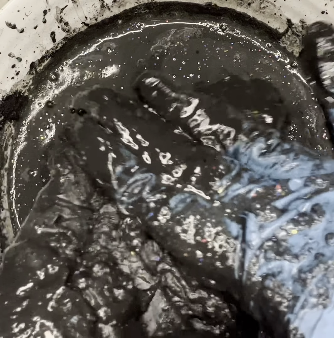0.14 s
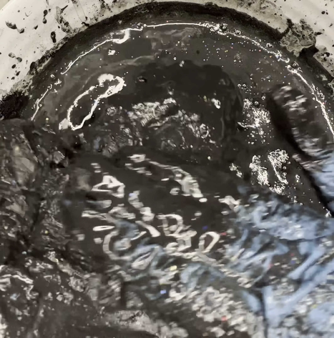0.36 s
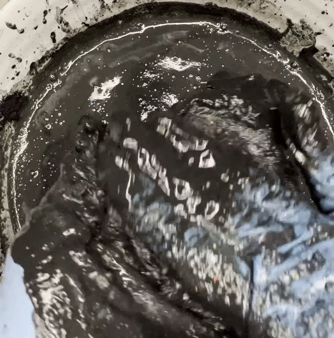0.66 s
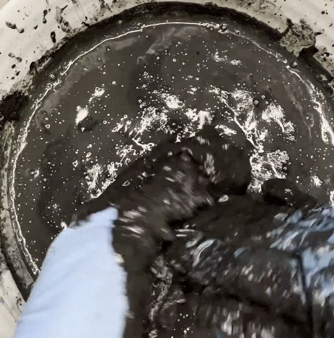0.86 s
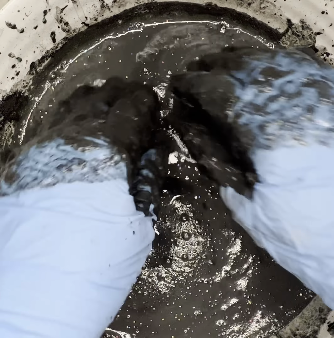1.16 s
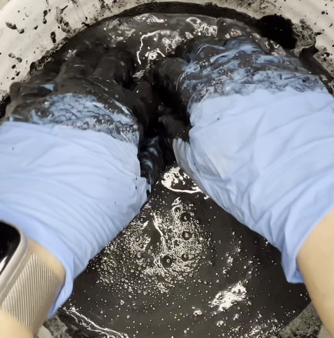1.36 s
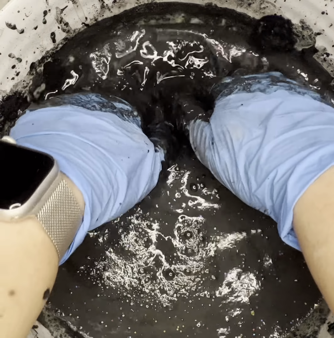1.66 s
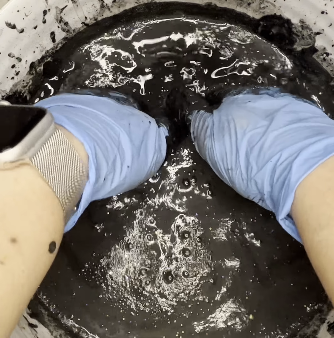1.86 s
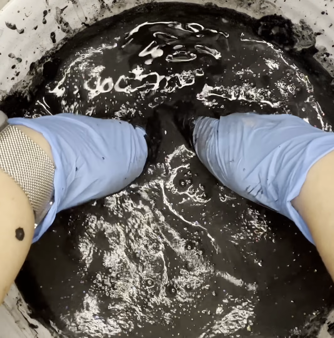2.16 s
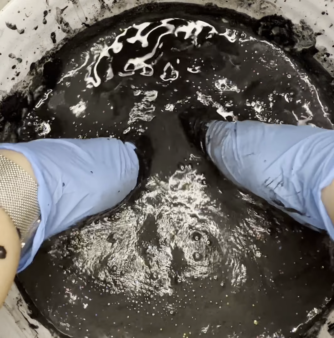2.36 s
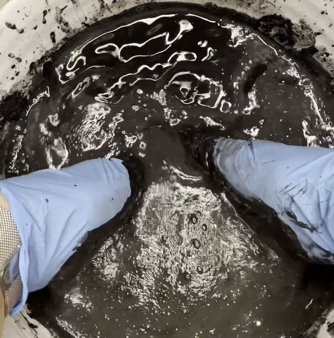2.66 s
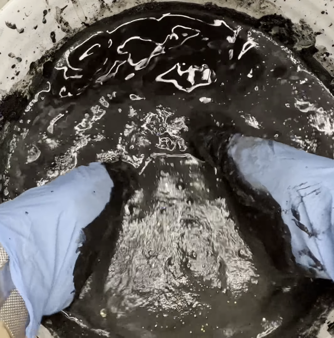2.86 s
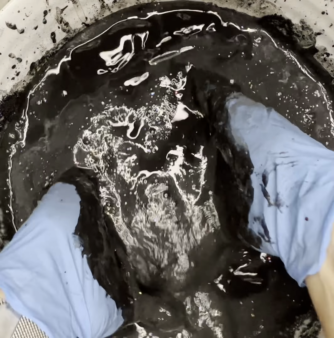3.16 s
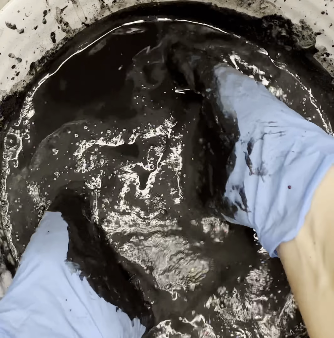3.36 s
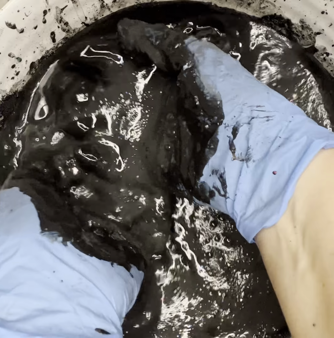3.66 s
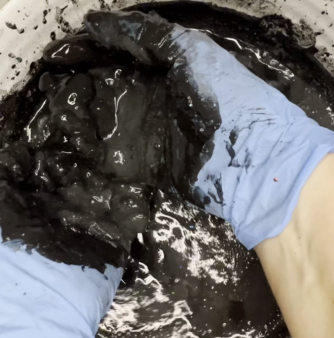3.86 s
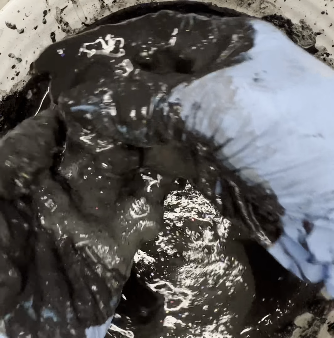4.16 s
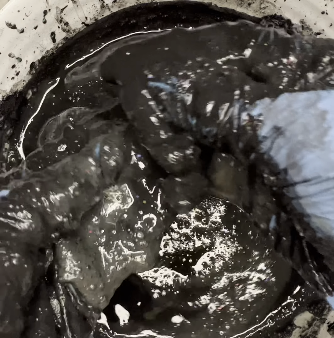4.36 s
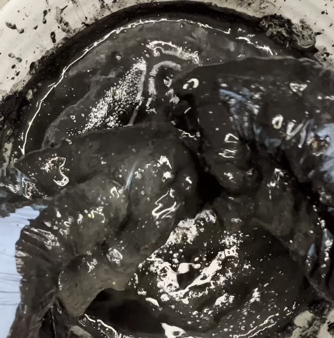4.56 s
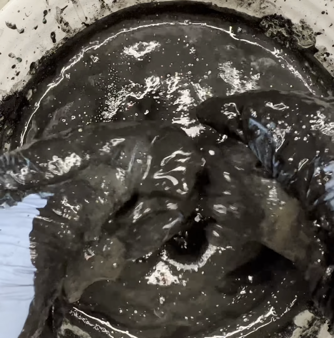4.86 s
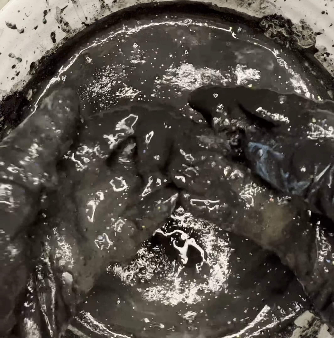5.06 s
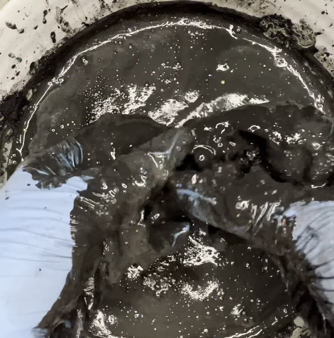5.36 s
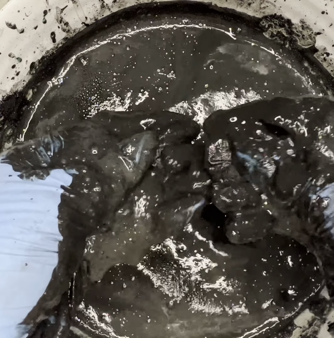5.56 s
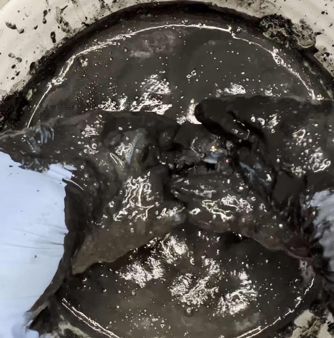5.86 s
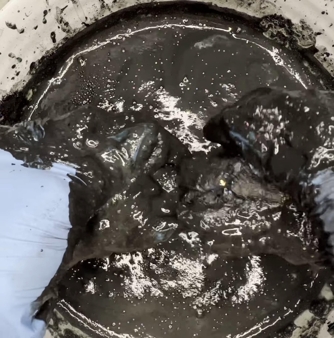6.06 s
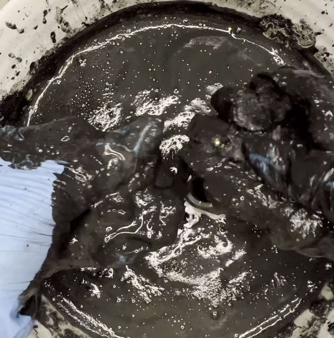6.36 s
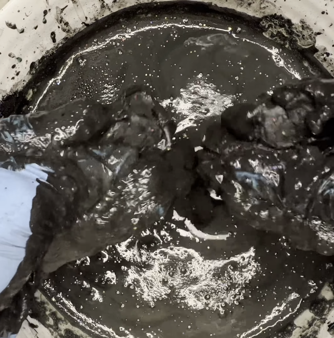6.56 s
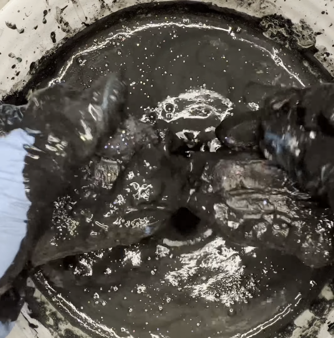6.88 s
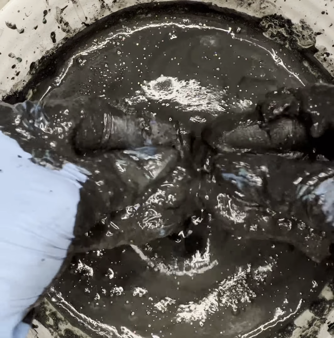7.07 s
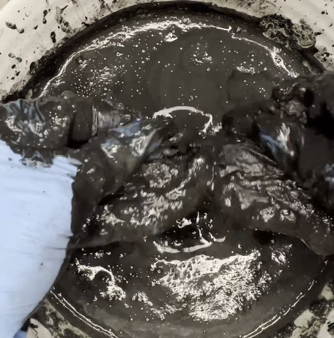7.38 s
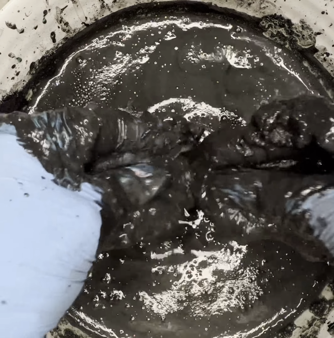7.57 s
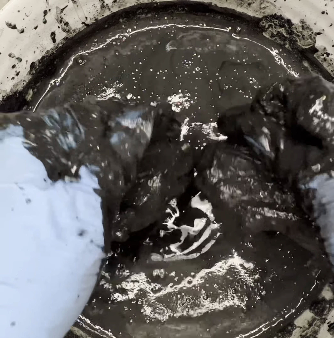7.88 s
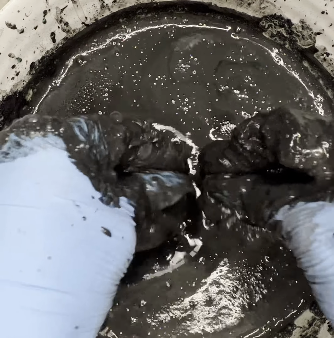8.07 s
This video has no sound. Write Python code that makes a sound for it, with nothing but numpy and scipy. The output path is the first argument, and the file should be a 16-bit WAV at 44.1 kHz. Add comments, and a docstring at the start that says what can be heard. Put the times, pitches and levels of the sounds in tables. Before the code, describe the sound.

Soaked chalk is crushed in a bowl of slurry, heard close and dry. Crunchy, fizzing crumbs open the scene, followed by sharp snaps, gulping paste and a dull push on the bowl. A lull ends in one forceful break. Irregular pops and ticks then run into renewed grainy crackling, all over a steady low electrical hum, room rumble and, late on, a faint distant motor.

```python
"""A small room with mains hum, low rumble and, late on, a distant motor spinning up.
Close to a phone, gloved hands crush water-soaked chalk in a bowl of slurry.
Snaps are short fractures through filters with ringing wet pockets; one block rings as it breaks in two.
Grit, crumbs and squelching paste are showers of random clicks, coloured and ridden by the hands.
Gulps are sputtering clicks through one resonance; pushes ring the bowl as decaying sines."""
import sys
import numpy as np
from scipy import signal
from scipy.fft import rfft, irfft
from scipy.io import wavfile
from scipy.ndimage import uniform_filter1d

SR = 44100
rng = np.random.default_rng(int(sys.argv[2]) if len(sys.argv) > 2 else 0)


def to_wav(s):
    """Save 16-bit WAV."""
    ch = np.atleast_2d(s).T  # columns
    pcm = np.round(np.clip(ch, -1, 1) * 32767)  # PCM
    wavfile.write(sys.argv[1], SR, pcm.astype(np.int16))


N = 362502
TIME = np.arange(N) / SR  # s
OPPOSITE = np.array([[1], [-1]])  # left and right pulled apart

# Event levels are set before panning.
# motor's second order, twice its turning rate: [t/s, f/Hz, level/dB]
MOTOR = [(6.1, 140, -93), (6.55, 181, -42.5), (6.9, 201, -65), (7.3, 211, -46.5), (8.22, 213, -46.5)]
# steady work of the hands: [t/s, rubbing level/dB shared by crumbs and grit, paste squelch level/dB]
HANDS = [(0.0, -41.5, -62), (0.82, -43, -56), (1.19, -50.5, -53.5), (1.58, -43, -43.5), (1.83, -49, -46.5),
         (2.27, -49, -47.5), (3.07, -56, -58), (3.59, -57.5, -57), (5.01, -50, -56), (5.33, -52, -49),
         (5.91, -48, -54), (6.68, -42, -53.5), (7.3, -44, -51), (7.62, -40, -53), (8.08, -40.5, -51),
         (8.22, -41.5, -46.5)]
# finger strokes across the chalk: [t/s, length/s, crumb level/dB, grit over crumbs/dB]
STROKES = [(0.043, 0.11, -42, 5), (0.272, 0.081, -40, -5), (0.372, 0.12, -43.5, 2),
           (0.596, 0.33, -43.5, 1.5), (1.498, 0.075, -41, -11), (1.628, 0.083, -43.5, -0.5),
           (4.378, 0.11, -48.5, -13), (6.449, 0.186, -44, 3.5), (6.8, 0.096, -47, 6.5),
           (6.93, 0.1, -45.5, -2), (7.339, 0.14, -47, 6.5), (7.664, 0.24, -52.5, 12.5)]
# hollow between the fingers: [t/s, ratio applied to the texture's resonances]
FINGER_GAP = [(0, 0.8), (.9, 0.82), (1.68, 1), (1.79, 0.71), (2.6, 1), (6.3, 0.96)]
# where the fingers work: [t/s, added shift to the left/dB]
SIDE_OF_WORK = [(1.2, -1.5), (1.85, 2), (2.6, 0)]
# lumps giving way: [t/s, wet pocket f/Hz, pocket level/dB, crack level/dB, grit tick level/dB]
SNAPS = [(0.3973, 3550, -34, -27, -22), (0.8656, 1000, -43.5, -38.5, -23), (1.111, 1220, -28.5, -27, -26.5),
         (1.194, 990, -26.5, -20.5, -22), (3.295, 1130, -21, -20, -30.5), (4.006, 1597, -38.5, -33.5, -38),
         (4.1524, 576, -34.5, -37, -41), (4.47, 640, -42, -40.5, -35), (4.5575, 606, -37.5, -38.5, -40),
         (4.64, 3480, -38.5, -27.5, -26), (4.7222, 1420, -33.5, -30.5, -31.5),
         (4.9089, 1390, -34.5, -32.5, -35.5), (4.937, 730, -26, -28.5, -25), (4.955, 690, -37, -36, -30),
         (4.973, 700, -38.5, -44, -31), (5.187, 2700, -41, -30.5, -32.5), (5.2651, 695, -34, -28, -26),
         (5.269, 1400, -41, -29, -27), (5.2991, 616, -27.5, -28.5, -25), (5.5023, 637, -40.5, -37.5, -43),
         (5.604, 2530, -30, -48, -32), (5.698, 931, -37, -29, -39), (5.7129, 580, -48, -45, -29),
         (6.05, 646, -17.5, -34, -36), (6.3665, 569.6, -68, -44, -28.5), (6.7945, 1700, -47, -46, -29.5),
         (7.0684, 674, -48, -36.5, -32), (7.386, 930, -35.5, -34.5, -36), (7.8731, 2380, -37.5, -24, -32),
         (8.188, 656, -53, -35, -27)]
# small pieces coming off: [t/s, f/Hz, level/dB]
FRAGMENTS = [(1.364, 3440, -36), (2.133, 6700, -39.5), (3.6426, 1220, -41), (4.0526, 4900, -38),
             (4.23, 590, -37.5), (4.385, 4470, -39), (4.4336, 3100, -31.5), (4.453, 3050, -43),
             (4.481, 1120, -38), (4.526, 1830, -34.5), (4.5787, 1880, -39), (4.645, 3324, -47),
             (4.762, 6900, -36), (4.8572, 1060, -29.5), (4.879, 2280, -43), (5.0134, 1430, -32),
             (5.2344, 914, -27.5), (5.34, 691, -37), (5.353, 720, -39.5), (5.5524, 2430, -32.5),
             (5.576, 2486, -43), (5.786, 1950, -43), (6.027, 6370, -33.5), (6.186, 7700, -34),
             (6.646, 9400, -36.5), (6.804, 2500, -34.5), (6.8793, 2920, -26.5), (6.892, 5640, -35),
             (7.079, 6400, -38.5), (7.5263, 2600, -28.5)]
# chalk tearing and caving in: [t/s, length/s, level/dB before the swell]
TEARS = [(1.107, 0.0047, -19), (1.683, 0.015, -33), (3.295, 0.022, -29), (3.315, 0.079, -33.5),
         (3.3476, 0.019, -23), (3.372, 0.014, -31.5), (3.394, 0.015, -40), (4.212, 0.029, -39)]
# pushes that reach the bowl and table: [t/s, level/dB on top of the bowl's modes]
THUMPS = [(1.347, -32), (3.295, -23.5), (4.938, -31), (5.301, -38.5)]
# modes of the bowl on the table: [f/Hz, level/dB relative to the push, t60/s]
BOWL_MODES = [(74.8, 1, 0.84), (153, 10, 0.13), (205, 4, 0.072)]
# air and slurry squeezed out: [t/s, time to swell/s, f/Hz, level/dB before the swell]
GULPS = [(1.351, 0.0055, 1200, -30), (1.544, 0.0093, 1700, -34.5), (1.684, 0.0079, 1520, -30.5),
         (1.765, 0.0068, 537, -33), (1.862, 0.0092, 8500, -39), (3.574, 0.022, 1110, -55),
         (3.815, .025, 3540, -49.5)]
# modes of the big block as it breaks: [f/Hz, starting peak level/dB]
BLOCK_MODES = [(1020, -8.5), (1450, -6), (2500, -6)]

# Colours are spectral outlines; only their shape counts, as the level is set afterwards.
# room rumble: [f/Hz, level/dB]
ROOM_COLOUR = [(24, 1.5), (38, -8.5), (170, -13.5), (300, -25.5), (1000, -38), (4000, -65), (15000, -53)]
# table rumble under the paste: [f/Hz, level/dB]
TABLE_COLOUR = [(55, -12.5), (300, -37), (900, -53.5)]
# wet paste: [f/Hz, level/dB]
PASTE_COLOUR = [(200, 2), (400, -1), (640, 7), (820, -1.5), (1020, 7), (1500, -3), (2100, -0.5),
                (4000, -71)]
# collapsing crumbs: [f/Hz, level/dB]
CRUMB_COLOUR = [(1300, -10), (2150, -3.5), (2600, 1.5), (3100, 1.5), (5000, -2), (9000, -14.5)]
# fine grit: [f/Hz, level/dB]
GRIT_COLOUR = [(3000, -40), (5000, -4), (7200, 5), (10000, -2.5), (12500, 1.5), (15500, -5)]
# body of a crack: [f/Hz, level/dB]
CRACK_COLOUR = [(700, -58), (1500, -16), (2500, -0.5), (3500, 2.5), (4800, -7.5), (7500, -42)]
# bright tick of grit: [f/Hz, level/dB]
TICK_COLOUR = [(2500, -29), (5000, -1), (7000, -1), (10000, -7.5), (13000, -3), (16000, -16)]
# tearing chalk: [f/Hz, level/dB]
TEAR_COLOUR = [(200, -6.5), (750, -23.5), (980, -7), (3400, -11), (5000, -24), (15000, -25.5)]

HUM_HZ, HUM_DB = 120, -36.5
RUB_DB = -3  # crumbs and grit each, against the rubbing level
STROKE_ATTACK_S, STROKE_RELEASE_S = 0.015, 0.03
CRACK_RUN_S = 0.00034  # time a crack takes to cross a lump
BITS_HZ, BITS_DB = 3170, -45.5  # centre of the small bits that a snapping lump sheds
GULP_Q = 4.5  # sharpness of the pocket's resonance
BLOCK_S, BLOCK_T60 = 3.2955, 0.0089  # start and decay, s
TOP_HZ = 15900  # where the phone cuts the treble


def undb(db):
    """Decibels to gain."""
    return 10 ** (np.asarray(db) / 20)


def level(x, db):
    """Scale to an rms level in dB."""
    return x * undb(db) / np.sqrt(np.mean(x ** 2) + 1e-20)


def burst_level(x, db):
    """Scale a burst to the energy of 10 ms at this rms level in dB."""
    return level(x, db + 10 * np.log10(SR / 100 / x.shape[-1]))


def pan(db):
    """Channel gains for a left minus right level in dB."""
    return undb(db * OPPOSITE / 2)


def curves(table):
    """Automation: the columns of a table joined by straight lines in time."""
    s, *columns = np.transpose(table)
    return [np.interp(TIME, s, column) for column in columns]


def colour(x, points, size=1024):
    """Causal minimum-phase filter with the given (Hz, dB) outline."""
    hz, db = np.transpose(points)
    grid = np.maximum(np.arange(size // 2 + 1) * SR / size, 1)
    outline_db = np.interp(np.log(grid), np.log(hz), db)
    # folding the cepstrum puts all the response after the onset
    cepstrum = irfft(np.log(undb(outline_db)))
    cepstrum[1:size // 2] *= 2
    cepstrum[size // 2 + 1:] = 0
    response = irfft(np.exp(rfft(cepstrum)))
    return signal.fftconvolve(x, response[None], axes=1)[:, :x.shape[1]]


def ports(length, apart):
    """Noise at the two microphone ports, partly shared."""
    shared, own = rng.standard_normal((2, length))
    return (shared + apart * own * OPPOSITE) / np.hypot(1, apart)


def fade(t, t60):
    """Exponential decay by 60 dB in t60 seconds."""
    return undb(-60 * t / t60)


def add(out, s, x):
    """Mix a sound in at time s."""
    start = min(max(int(s * SR), 0), N)
    out[:, start:start + x.shape[1]] += x[:, :N - start]


def walk(rate):
    """Smooth chance with a spread of 1 that changes about rate times a second."""
    span = int(SR / rate)
    smooth = uniform_filter1d(rng.standard_normal(N), span)
    return level(uniform_filter1d(smooth, span), 0)


def grains(length, rate, scatter_db, apart):
    """Random clicks, rate a second, with chance sizes and stereo places."""
    happens = rng.random(length) < rate / SR
    size = undb(scatter_db * np.minimum(rng.standard_exponential(length), 4))
    return happens * size * ports(length, apart)


def fracture(t, splinter_db, tail_db, tail_t60, apart):
    """One sharp break, splinters while the crack runs, then scatter between hands and bowl."""
    first = np.zeros((2, len(t)))
    first[:, 0] = 1
    splinters = ports(len(t), apart) * np.exp(-(t / (2 * CRACK_RUN_S)) ** 2)
    tail = ports(len(t), apart) * fade(t, tail_t60)
    return first + undb(splinter_db) * splinters + undb(tail_db) * tail


def background():
    """Mains hum as a sine, ventilation rumble as dark noise, and a motor's two orders rising in pitch."""
    hum = np.sin(2 * np.pi * HUM_HZ * TIME + 0.36 * OPPOSITE)
    hum = np.sqrt(2) * undb(HUM_DB) * pan(-1.6) * hum
    hz, db = curves(MOTOR)
    turn = np.pi * np.cumsum(hz) / SR  # phase of the first order
    motor = np.sqrt(2) * undb(db) * (np.sin(2 * turn) + undb(-1.0) * np.sin(turn))
    rumble = level(colour(ports(N, apart=0.66), ROOM_COLOUR, size=8192), -39.5) * pan(0.17)
    return hum + motor + rumble


def ticks():
    """Lone wet grains keep parting with faint ticks, under all the rest."""
    clicks = grains(N, rate=31, scatter_db=0.5, apart=0.2)
    bright = level(colour(clicks, TICK_COLOUR), 0)
    body = level(colour(clicks, TEAR_COLOUR), 0)
    return level(bright + body, -61)


def strokes():
    """Gains of crumbs and grit: each stroke bites, slides and lets go, over the steady rubbing."""
    rub_db, _ = curves(HANDS)
    crumbs = grit = undb(rub_db + RUB_DB)
    for s, length, db, grit_db in STROKES:
        bite = np.clip((TIME - s) / STROKE_ATTACK_S, 0, 1)
        release = np.clip(1 - (TIME - s - length) / STROKE_RELEASE_S, 0, 1)
        slide = bite * release
        crumbs = np.hypot(crumbs, undb(db) * slide)
        grit = np.hypot(grit, undb(db + grit_db) * slide)
    return crumbs, grit


def chips(low_hz, high_hz, cycles, scatter_db, count=2400, size=256):
    """Many grains part one by one, each with a tiny ring at its own pitch; rms 1."""
    out, t = np.zeros((2, N)), np.arange(size) / SR
    for when, pitch, strength, side in rng.random((count, 4)):
        hz = low_hz * (high_hz / low_hz) ** pitch
        # the root evens out the energy of long low and short high rings
        ring = np.sin(2 * np.pi * hz * t) * fade(t, cycles / hz) * np.sqrt(hz)
        add(out, when * N / SR, ring * undb(scatter_db * strength ** 2) * pan(10 * (side - .5)))
    return level(out, 0)


def retune(x, ratio):
    """Read a texture at a moving speed, which shifts every resonance by that ratio; rms 1."""
    place = np.cumsum(ratio)
    return level(np.array([np.interp(place, np.arange(len(side)), side) for side in x]), 0)


def kneading():
    """Tiny bubbles burst in paste, crumbs collapse and grit fizzes, all in the same uneven spurts."""
    crumb_gain, grit_gain = strokes()
    _, paste_db = curves(HANDS)
    gap, = curves(FINGER_GAP)
    spurts = undb(1.2 * walk(126))
    # larger grains stand out of the rubbing, each with its own pitch
    crackle = chips(low_hz=2230, high_hz=5750, cycles=16, scatter_db=13)
    sparkle = chips(low_hz=4800, high_hz=14000, cycles=6.6, scatter_db=33)

    # the hollow between the fingers changes size and slides its resonances
    slide = gap * np.exp(.06 * walk(14))
    bubbles = grains(2 * N, rate=1500, scatter_db=1.0, apart=0.2)
    paste = retune(colour(bubbles, PASTE_COLOUR), slide)
    collapse = grains(2 * N, rate=4200, scatter_db=0.0, apart=0.22)
    crumbs = undb(-0.4) * retune(colour(collapse, CRUMB_COLOUR), slide)
    crumbs = crumbs + undb(-5.5) * retune(crackle, slide)

    fizz = grains(N, rate=12000, scatter_db=-1.5, apart=0.51)
    grit = level(colour(fizz, GRIT_COLOUR), 0) + undb(-6) * sparkle
    # a deep hollow also muffles the finest grit: a copy one sample late dulls the top
    grit = level(grit + 2 * (1 - np.minimum(gap, 1)) * np.roll(grit, 1, axis=1), 0)
    # fine grit catches and slips on its own between the gloves
    grit = level(grit * undb(2 * walk(36)), 0)

    # pressing on the bowl makes the table rumble, 13.1 dB over the paste
    rumble = level(colour(ports(N, apart=1.6), TABLE_COLOUR, size=4096), 13.1)
    pressed = (paste * pan(-5.0) + rumble * pan(1.2)) * undb(paste_db)
    rubbed = crumbs * crumb_gain * pan(-3.5) + grit * grit_gain * pan(-1.3)
    return spurts * (pressed + rubbed)


def cavities(x, low_hz, high_hz, count=3):
    """The hollows around a breaking lump ring at a few chance pitches."""
    out = x
    for where in rng.random(count):
        hz = low_hz * (high_hz / low_hz) ** where
        out = out + undb(10.5) * signal.lfilter(*signal.iirpeak(hz, 11, fs=SR), x)
    return out


def snaps(size=3072):
    """Each lump cracks, spits grit and opens a pocket of air in the paste that rings briefly."""
    out, t = np.zeros((2, N)), np.arange(size) / SR
    for s, hz, pocket_db, crack_db, tick_db in SNAPS:
        crack = fracture(t, splinter_db=-8.0, tail_db=-8.0, tail_t60=0.016, apart=0.17)
        crack = cavities(colour(crack, CRACK_COLOUR), low_hz=1530, high_hz=5900)
        tick = fracture(t, splinter_db=-4.5, tail_db=-18, tail_t60=0.026, apart=0.43)
        tick = colour(tick, TICK_COLOUR)
        depth = (600 / max(hz, 600)) ** 4  # 1 for the deepest pockets
        ring = np.sin(2 * np.pi * hz * t + 0.74 * depth * OPPOSITE) * fade(t, 17 / hz)
        slap = fracture(t, splinter_db=5, tail_db=9, tail_t60=0.03, apart=0.24)
        slap = colour(slap, PASTE_COLOUR)
        # a pocket that opens without a crack rings clean; a hard crack slaps the paste around it
        slap_db = min(pocket_db + 0.5, crack_db + 7.5)
        # low pockets lie under the right hand
        pocket = burst_level(ring, pocket_db) * pan(-2 - 4 * depth)
        pocket = pocket + burst_level(slap, slap_db) * pan(-3.5)
        chalk = (burst_level(crack, crack_db) + burst_level(tick, tick_db)) * pan(-2.0)
        add(out, s, pocket + chalk)
    return out


def fragments(size=1024, count=4):
    """Small pieces click off at their own pitches; every piece and snap sheds fainter bits."""
    out, t = np.zeros((2, N)), np.arange(size) / SR
    showers = [(s, hz, db - 15) for s, hz, db in FRAGMENTS]
    showers += [(row[0], BITS_HZ, BITS_DB) for row in SNAPS]
    bits = []
    for s, hz, db in showers:
        for late, pitch, strength in rng.standard_normal((count, 3)):
            bits.append((s + .028 * abs(late), hz * np.exp(pitch / 2), db + 2 * strength))
    for s, hz, db in list(FRAGMENTS) + bits:
        click = fracture(t, splinter_db=-7.5, tail_db=-14, tail_t60=0.017, apart=0.27)
        ring = signal.lfilter(*signal.iirpeak(min(hz, SR / 3), 3.5, fs=SR), click)
        add(out, s, burst_level(ring, db))
    return out * pan(-2.3)


def tears(size=4096):
    """A dense run of small fractures as a face of chalk pulls apart."""
    out, t = np.zeros((2, N)), np.arange(size) / SR
    for s, length, db in TEARS:
        swell = np.minimum(t / 0.0012, 1) * np.exp(-(t / length) ** 4)
        run = grains(size, rate=2000, scatter_db=-0.5, apart=0.33)
        add(out, s, swell * level(colour(run, TEAR_COLOUR), db))
    return out * pan(-2.9)


def thumps(size=16384):
    """Hard pushes shake bowl and table, which rocks the two ports against each other."""
    out, t = np.zeros((2, N)), np.arange(size) / SR
    ring = 0
    for hz, db, t60 in BOWL_MODES:
        ring = ring + undb(db) * np.sin(2 * np.pi * hz * t + OPPOSITE) * fade(t, t60)
    attack = np.minimum(t / .001, 1)
    for s, db in THUMPS:
        add(out, s, undb(db) * ring * attack * pan(-4))
    return out


def gulps(size=8192):
    """Air and slurry force through a narrow pocket, which sputters and rings at one pitch."""
    out, t = np.zeros((2, N)), np.arange(size) / SR
    for s, swell_s, hz, db in GULPS:
        bubbling = grains(size, rate=1300, scatter_db=4.5, apart=0.38)
        ring = signal.lfilter(*signal.iirpeak(hz, GULP_Q, fs=SR), bubbling)
        swell = t / swell_s * np.exp(1 - t / swell_s)
        add(out, s, swell * level(ring, db))
    return out * pan(-2.2)


def block(size=2048):
    """The big block rings briefly at its modes as it breaks in two."""
    out, t = np.zeros((2, N)), np.arange(size) / SR
    ring = sum(undb(db) * np.sin(2 * np.pi * hz * t) for hz, db in BLOCK_MODES)
    add(out, BLOCK_S, ring * fade(t, BLOCK_T60) * pan(-1.4))
    return out


def scene():
    """The chalk in its room; gulps and kneading move with the fingers."""
    side_db, = curves(SIDE_OF_WORK)
    fingers = (kneading() + gulps()) * pan(side_db)
    breaks = snaps() + fragments() + tears() + block()
    return background() + ticks() + fingers + breaks + thumps()


def record(dry):
    """The phone clips peaks beyond full scale, then a steep low-pass cuts the top."""
    low_pass = signal.ellip(10, .2, 70, TOP_HZ, fs=SR, output="sos")
    return signal.sosfilt(low_pass, np.clip(dry, -1, 1))


dry = scene()
out = record(dry)
to_wav(out)
```